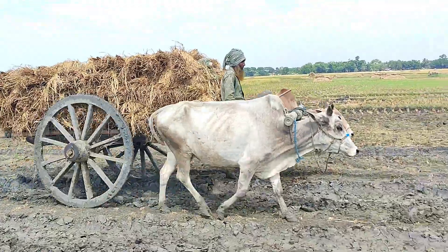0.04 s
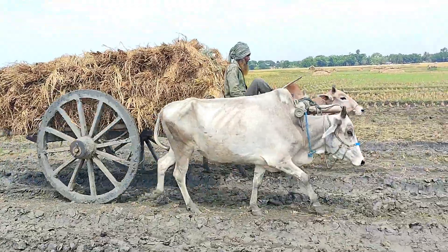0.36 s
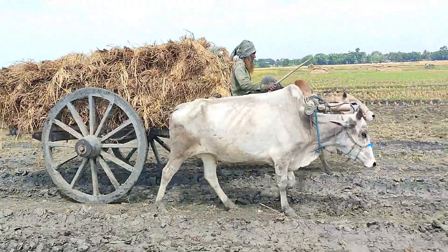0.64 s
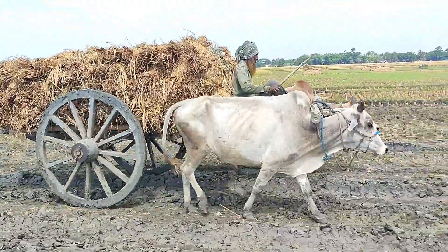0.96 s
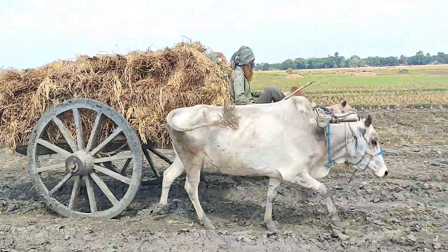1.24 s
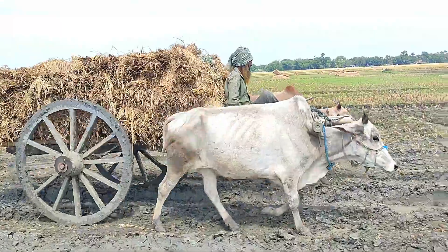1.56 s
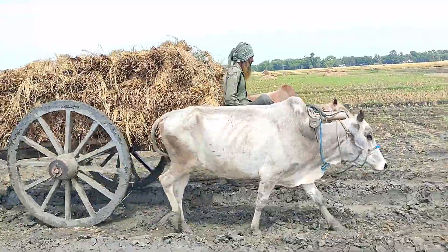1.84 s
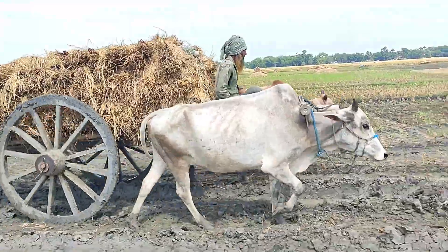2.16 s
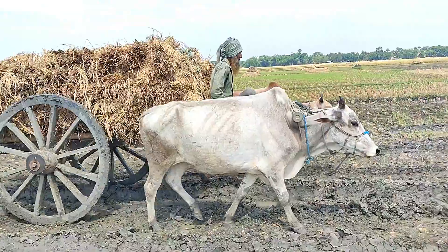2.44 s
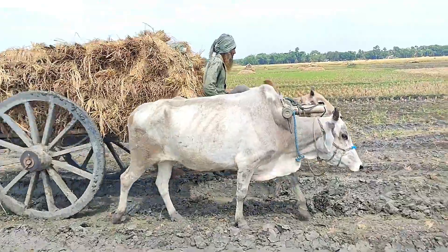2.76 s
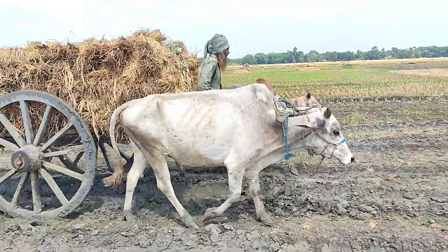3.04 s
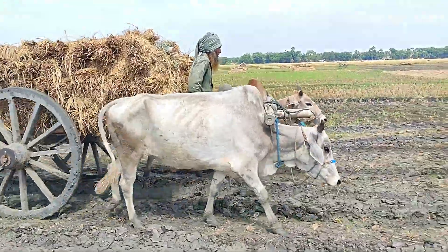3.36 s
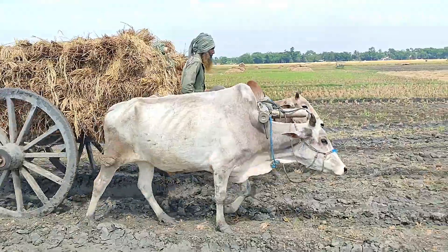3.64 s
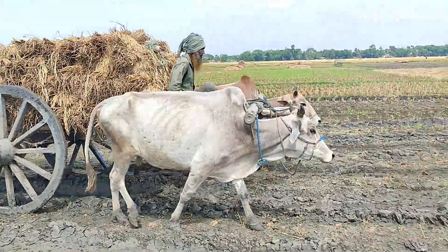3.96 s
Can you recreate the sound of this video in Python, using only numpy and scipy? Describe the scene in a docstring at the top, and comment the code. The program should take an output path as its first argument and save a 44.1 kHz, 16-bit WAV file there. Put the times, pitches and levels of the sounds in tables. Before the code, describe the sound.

An ox cart loaded with straw rolls over a muddy field a few metres away. Straw hisses and ticks, hooves squelch softly, and three sharp rattling clacks stand out, while wind gusts rumble and thump on the microphone.

```python
"""On a muddy field, a few metres away, a bullock cart loaded with straw rolls along.
The straw hisses, snaps and rustles, and hooves squelch softly in the mud. Among small dry
ticks, three sharp rattling clacks stand out: runs of brief contacts that excite damped modes.
Gusts of turbulent wind rumble on two microphone ports, each on its own, and eddies bump them."""
import sys
import numpy as np
from scipy import signal
from scipy.fft import rfft, irfft
from scipy.io import wavfile
from scipy.ndimage import uniform_filter1d, map_coordinates

SR = 44100
rng = np.random.default_rng(int(sys.argv[2]) if len(sys.argv) > 2 else 0)


def digitize_waveform(pressure):
    """Quantize a signal to 16-bit integers and store it at the path in sys.argv[1].

    Rows of a 2-D input are taken as channels; values are limited to [-1, 1].
    """
    field = np.atleast_2d(pressure).T
    bounded = np.clip(field, -1, 1)
    quanta = np.round(bounded * 32767).astype(np.int16)
    wavfile.write(sys.argv[1], SR, quanta)


N = 176400
T = np.arange(N) / SR
FREQS = np.arange(N // 2 + 1) * SR / N + 1e-3


def undb(db):
    """Decibels are logarithmic: 20 dB is a tenfold amplitude."""
    return 10 ** (np.asarray(db) / 20)


def unit(x):
    """Normalisation to an rms of 1."""
    return x / np.sqrt(np.mean(x ** 2))


def curve(rows):
    """Linear interpolation in time between (seconds, value) points."""
    return np.interp(T, *np.array(rows).T)


def colour(rows):
    """A spectral envelope: (Hz, dB) points interpolated over log frequency."""
    hz, db = np.array(rows).T
    return undb(np.interp(np.log(FREQS), np.log(hz), db))


def resonance(hz, width):
    """Frequency response of a damped oscillator, with gain 1 at its centre."""
    return 1 / (1 + 1j * (FREQS ** 2 - hz ** 2) / (FREQS * width))


def shape(x, response):
    """Filtering multiplies a spectrum by a frequency response."""
    return irfft(rfft(x) * response, N)


def noise(response):
    """Filtered white noise of rms 1, uncorrelated between left and right."""
    return unit(shape(rng.standard_normal((2, N)), response))


def band_noise(hz, width):
    """Two resonances in cascade confine noise to a band."""
    return noise(resonance(hz, width) ** 2)


def steady(x, samples):
    """Division by the running rms flattens an envelope."""
    return x / np.sqrt(uniform_filter1d(x ** 2, size=samples))


def waver(hz):
    """Low-passed noise: a smooth random fluctuation of rms 1, at rates up to about hz."""
    return unit(shape(rng.standard_normal(N), 1 / (1 + (FREQS / hz) ** 4)))


def strike(start, decay, rise_s):
    """Envelope of a transient: linear rise, exponential decay."""
    age = np.maximum(T - start, 0)
    fall = np.exp(-np.minimum(np.maximum(age - rise_s, 0) / decay, 50))
    return np.minimum(age / rise_s, 1) * fall


# Wind strength at each port. Each row: time in seconds, relative level in dB.
LEFT_GUSTS = [(0, -41), (.2, -36), (.32, -43), (.61, -39.5), (.72, -36), (.95, -34), (1.03, -44),
              (1.3, -31.5), (1.51, -34), (1.6, -41), (1.7, -32), (1.82, -45), (1.9, -35), (2.14, -29),
              (2.48, -36), (2.73, -25), (2.84, -32), (3.02, -35), (3.17, -26), (3.37, -27), (3.6, -30.5),
              (3.67, -35.5), (3.73, -25), (4, -34.5)]
RIGHT_GUSTS = [(0, -37), (.15, -35), (.2, -28), (.36, -28.5), (.53, -16.5), (.63, -28), (.76, -21),
               (.87, -25.5), (.93, -32), (1.03, -39), (1.17, -32.5), (1.4, -39.5), (1.57, -33), (1.8, -43),
               (2.1, -33), (2.63, -33), (2.76, -24.5), (2.83, -30.5), (2.91, -23), (3.01, -28), (3.13, -21),
               (3.33, -31), (3.43, -22), (3.66, -32.5), (3.73, -24), (4, -28)]
# Rumble of a gust of reference strength. Each row: frequency in Hz, relative spectral level in dB.
RUMBLE_SPECTRUM = [(10, -5.5), (30, 4.5), (60, 1), (110, -2), (200, -11), (350, -22), (600, -33),
                   (1000, -49.5), (2000, -59), (6000, -104)]
def wind(gusts, reference_db=-30, rumble_db=-26.5, db_per_octave=24):
    """Convected turbulence: faster air carries eddies past a port sooner, so louder and higher."""
    strength_db = curve(gusts) - reference_db
    flutter = waver(hz=69.9)
    speed = 2 ** (strength_db / db_per_octave + .22 * flutter)
    travel = np.cumsum(speed) % (N - 1)
    eddies = map_coordinates(noise(colour(RUMBLE_SPECTRUM))[0], [travel], order=3, mode="wrap")
    return steady(eddies, samples=4410) * undb(rumble_db + strength_db + 1.88 * flutter)


# Hiss of straw and field. Each row: frequency in Hz, relative spectral level in dB.
STRAW_SPECTRUM = [(200, 6), (600, -2), (1000, -0.5), (1800, -3), (3000, -1.5), (4500, -1), (6000, -1),
                  (7900, 2), (9500, -5), (12000, -7), (14000, -10)]
# Its lean to the left. Each row: frequency in Hz, level of left over right in dB.
STRAW_BALANCE = [(200, -8), (2000, 0.5), (4500, -4.5), (8000, 4.5), (10000, -7), (14000, 1.5)]
# Its swell as the load sways. Each row: time in seconds, gain in dB.
STRAW_SWELL = [(0, 0.5), (.25, -0.5), (.76, 1), (1.02, -3.5), (1.14, -1), (1.6, 4.5), (1.76, -0.5),
               (2.0, -5.5), (2.16, 2.5), (2.34, 0), (2.44, 1), (2.62, -4.5), (2.72, 4.5), (2.84, -2.5),
               (2.94, -0.5), (3.22, 1), (3.31, -4), (3.47, 0), (4, -4)]
def straw(hiss_db=-52.5, snap_db=-60, snaps_per_s=110, snap_decay_s=.0012):
    """Shot noise: stalks snap at random within a grainy hiss, and both swell as the load sways."""
    spectrum = colour(STRAW_SPECTRUM) * colour(STRAW_BALANCE) ** np.array([[.5], [-.5]])
    hiss = noise(spectrum) * unit(undb(2.2 * waver(hz=1050)))
    hiss *= undb(hiss_db + .6 * waver(hz=29))
    breaks = rng.random(N) < snaps_per_s / SR
    sizes = undb(4.5 * np.minimum(rng.standard_normal(N), 2))
    envelope = unit(signal.lfilter([1], [1, -np.exp(-1 / (snap_decay_s * SR))], breaks * sizes))
    snaps = undb(snap_db) * envelope * noise(spectrum)
    return (hiss + snaps) * undb(curve(STRAW_SWELL))


# Hooves and clods. Each row: start in seconds, level in dB, decay in seconds, centre in Hz.
SQUELCHES = [(0.025, -42.5, 0.026, 815), (0.137, -45, 0.011, 860), (.335, -49, 0.022, 1950),
             (1.115, -52.5, 0.022, 1810), (1.18, -44.5, 0.0043, 1350), (1.535, -49, 0.025, 1040),
             (1.579, -42, 0.0037, 890), (2.033, -48.5, 0.013, 1610), (2.29, -45, 0.007, 1110),
             (2.438, -41.5, 0.048, 830), (2.486, -38, 0.0065, 900), (2.531, -48.5, 0.045, 810),
             (2.93, -49, 0.01, 1900)]
def mud():
    """Random amplitude modulation gives grain to hoof squelches and the crumbling under the wheels."""
    steps = sum(undb(db) * strike(start, decay, rise_s=.007) * band_noise(hz, width=.8 * hz)
                for start, db, decay, hz in SQUELCHES)
    wheels = undb(-65.5 + 6.5 * waver(hz=9.8)) * band_noise(hz=1110, width=4600)
    grain = unit(undb(1.5 * waver(hz=117)))
    return (steps + wheels) * grain


# Shifts of the load. Each row: midpoint in seconds, level in dB, half length in seconds,
# centre in Hz, width in Hz.
LOAD_SHIFTS = [(0.052, -51, 0.046, 2900, 4050), (1.838, -52, 0.047, 2920, 1300),
               (1.846, -54, 0.083, 5730, 1820), (2.689, -53, .022, 6300, 11000)]
def rustles():
    """Friction noise: the load shifts with a soft swish under a Gaussian envelope."""
    return sum(undb(db) * np.exp(-((T - middle) / half_length) ** 2) * band_noise(hz, width)
               for middle, db, half_length, hz, width in LOAD_SHIFTS)


# Ticks of cart and straw. Each row: start in seconds, level in dB, decay in seconds,
# centre in Hz, width in Hz.
DRY_TICKS = [(.072, -45.5, 0.011, 6700, 5970), (.178, -40, 0.0016, 8100, 5000),
             (0.42, -41.5, 0.0066, 6540, 7000), (0.931, -43, 0.0019, 7900, 6000),
             (1.113, -46.5, 0.01, 5900, 1000), (1.179, -41.5, 0.011, 6340, 6000),
             (1.706, -54, 0.022, 2170, 252), (2.193, -43, 0.0023, 3980, 4000),
             (2.768, -45, 0.009, 4230, 4000), (3.238, -38, 0.0049, 6850, 5000),
             (3.253, -35, 0.0063, 5830, 6340), (3.398, -37.5, 0.0036, 4000, 700),
             (3.511, -39.5, 0.0037, 6300, 5000), (3.582, -35.5, 0.0055, 6350, 5950),
             (3.852, -48.5, 0.019, 3800, 2000), (3.927, -49, 0.015, 5030, 2000)]
def ticks():
    """Damped transients: each small dry snap is a band of noise that decays exponentially."""
    return sum(undb(db) * strike(start, decay, rise_s=.0019) * band_noise(hz, width)
               for start, db, decay, hz, width in DRY_TICKS)


# Eddies that hit the ports. Each row: start in seconds, level before filtering in dB, pitch in Hz,
# share on the right from 0 to 1.
STRONG_EDDIES = [(.187, -20.5, 304, 1), (.259, -32, 310, 1), (.295, -20, 355, 0.98), (.388, -25, 264, 0.9),
                 (.439, -15, 280, 0.8), (.501, -10.5, 384, 1), (.537, -14.5, 490, .98),
                 (.561, -6.5, 196, 1), (.687, -14, 361, .9), (.770, -11.5, 240, 0.99), (.845, -17, 400, 1),
                 (1.697, -23.5, 269, 0.2), (1.942, -27, 324, 0.18), (2.088, -22.5, 251, 0.83),
                 (2.146, -19, 264, 0.26), (2.713, -24, 258, 0.3), (2.752, -20, 345, 1),
                 (2.915, -19.5, 250, 1), (2.964, -18.5, 504, 0.1), (3.077, -18, 252, 0.1),
                 (3.102, -14, 342, 1), (3.165, -11, 250, 0.84), (3.273, -20.5, 356, 1),
                 (3.419, -14.5, 312, 1), (3.553, -14.5, 272, 0), (3.717, -10, 320, 1),
                 (3.843, -20, 283, 0.86), (3.935, -15, 206, 1)]
def bumps(decay_cycles=1.06, cutoff_hz=946, roughness=.41):
    """Heavily damped oscillation: a strong eddy pushes and pulls raggedly for a few cycles."""
    pressure = np.zeros((2, N))
    ragged = roughness * waver(cutoff_hz)
    for start, db, hz, right in STRONG_EDDIES:
        swing = np.sin(2 * np.pi * hz * (T - start)) + ragged * 2 * hz / cutoff_hz
        envelope = undb(db) * strike(start, decay_cycles / hz, rise_s=.0021)
        pressure += envelope * swing * np.array([[1 - right], [right]])
    low_pass = resonance(cutoff_hz, cutoff_hz * np.sqrt(2)) * cutoff_hz / (1j * FREQS * np.sqrt(2))
    return shape(pressure, low_pass)


def click_envelope(start, hold, rise_s=.0008, release_s=.0022):
    """Envelope of one click in a clack: a quick smooth swell, a brief hold, a fast fade."""
    age = T - start
    exponent = np.minimum(age, 0) / rise_s - np.maximum(age - hold, 0) / release_s
    return np.exp(np.maximum(exponent, -50))


# Contacts within the clacks. Each row: start in seconds, level in dB, hold in seconds, ring in Hz,
# relative ring level in dB, upper band edge in Hz, relative drive to the body in dB.
CLACK_CONTACTS = [(0.7776, -43, 0.011, 7130, 7.5, 11400, -24), (0.786, -39, .001, 7100, 9, 11800, -22),
                  (0.7864, -44.5, .010, 10950, 12.5, 11800, -22), (0.7926, -28, .0004, 7800, 5, 11700, -22),
                  (0.796, -37, 0.0018, 6160, 10.5, 11600, -11), (0.812, -44, .002, 8030, 3, 11800, -12),
                  (1.5198, -36.5, .006, 7240, 4, 12100, -12.5), (1.527, -21.5, 0.005, 7230, 0, 15500, -8.5),
                  (1.5339, -21.5, 0.0011, 7300, -3, 15300, -1.5),
                  (1.5377, -27, 0.00067, 4330, 7, 15200, -2), (2.4132, -37, .008, 5830, 2, 13300, -14),
                  (2.426, -36.5, 0.0059, 2180, -5, 8500, -9), (2.4293, -29.5, .001, 7630, 7.5, 13400, -13)]
# Grit of the contacts. Each row: frequency in Hz, relative spectral level in dB.
GRIT_SPECTRUM = [(300, -11), (900, 1), (1700, -1), (2800, 5), (4500, 1.5), (7500, -2), (9500, -4),
                 (11000, -6.5), (13200, 1), (14500, -15)]
# Modes of the struck body. Each row: frequency in Hz, gain in dB, time to fall 60 dB in seconds.
BODY_MODES = [(2100, 14, 0.029), (3190, 14.5, 0.058), (4435, 25, 0.048), (4785, 4, 0.078), (5870, 4, 0.039),
              (7298, 12, .04), (10950, 8, .03)]
def clacks(low_edge_hz=5200, low_leak_db=-13.5, scatter_db=-4.5):
    """Modal excitation: a scrape and a quick run of gritty contacts set the cart ringing."""
    grit = noise(colour(GRIT_SPECTRUM))
    high_pass = undb(low_leak_db) + 1 / (1 + (low_edge_hz / FREQS) ** 12)
    direct, drive = np.zeros((2, N)), np.zeros((2, N))
    for start, db, hold, ring_hz, ring_db, high_edge_hz, body_db in CLACK_CONTACTS:
        band = high_pass / (1 + (FREQS / high_edge_hz) ** 12)
        crack = unit(shape(grit, band))
        ring = steady(band_noise(ring_hz, width=630), samples=110)
        envelope = undb(db) * click_envelope(start, hold)
        direct += envelope * (crack + undb(ring_db) * ring)
        drive += envelope * crack * undb(body_db)
    body = sum(undb(db) * resonance(hz, np.log(1000) / (np.pi * t60)) for hz, db, t60 in BODY_MODES)
    direct += shape(drive, body)
    # Scattering off cart and ground is convolution with a short burst of noise.
    scatter = unit(rng.standard_normal((2, N)) * strike(0, decay=.008, rise_s=.00032)) / np.sqrt(N)
    return direct + undb(scatter_db) * shape(direct, rfft(scatter))


def scene():
    """Superposition: the pressures from wind, cart and team add at each port."""
    rumble = np.array([wind(LEFT_GUSTS), wind(RIGHT_GUSTS)])
    return rumble + bumps() + clacks() + ticks() + mud() + straw() + rustles()


def record(dry, cutoff_hz=13900):
    """Band limiting: a steep elliptic low-pass filter removes the highest treble."""
    return signal.sosfilt(signal.ellip(8, .2, 80, cutoff_hz, fs=SR, output="sos"), dry)


dry = scene()
out = record(dry)
digitize_waveform(out)
```